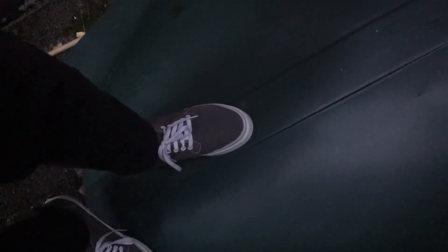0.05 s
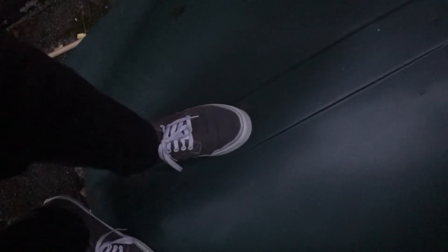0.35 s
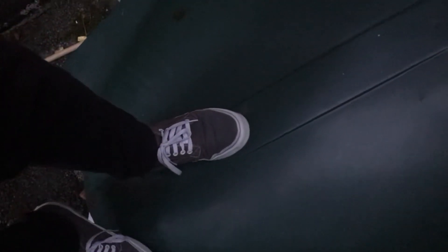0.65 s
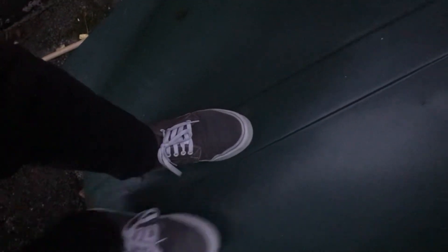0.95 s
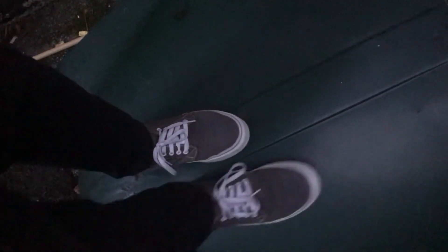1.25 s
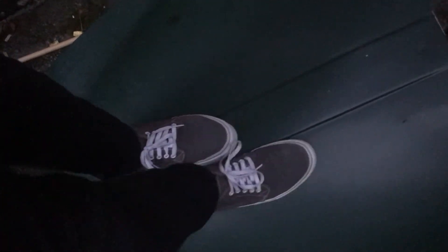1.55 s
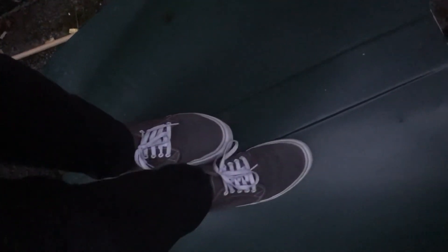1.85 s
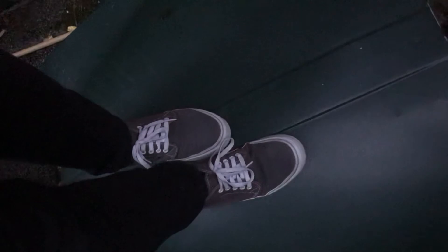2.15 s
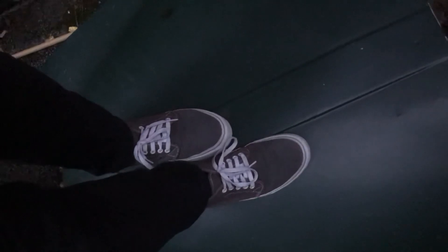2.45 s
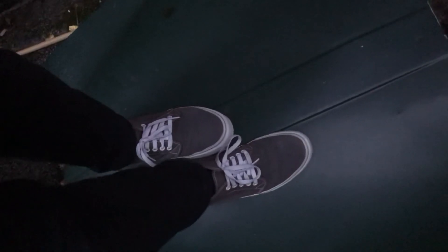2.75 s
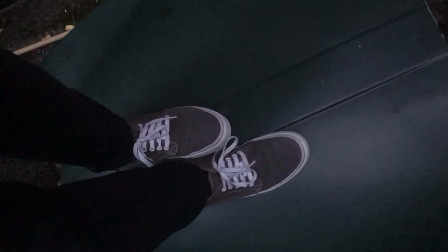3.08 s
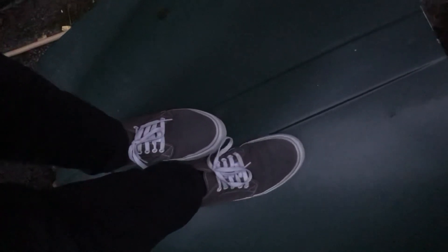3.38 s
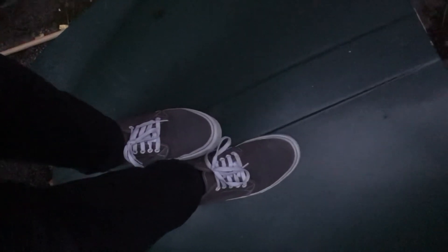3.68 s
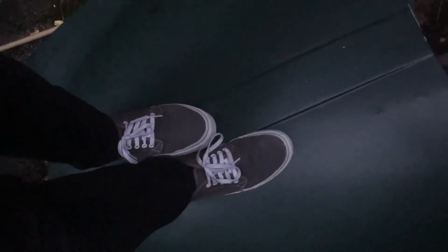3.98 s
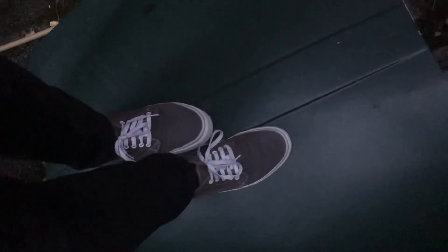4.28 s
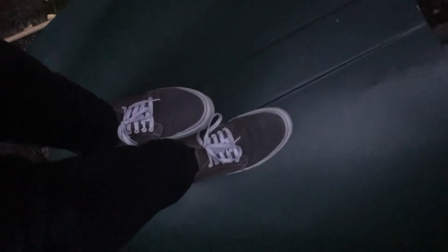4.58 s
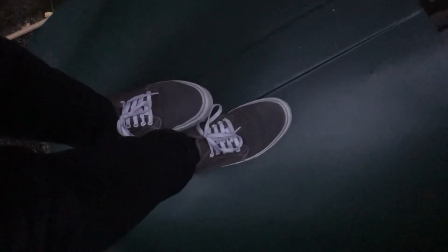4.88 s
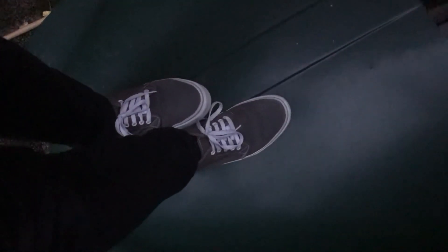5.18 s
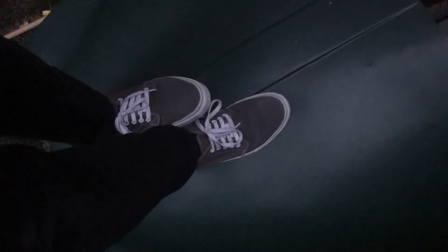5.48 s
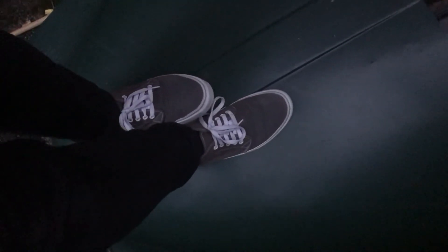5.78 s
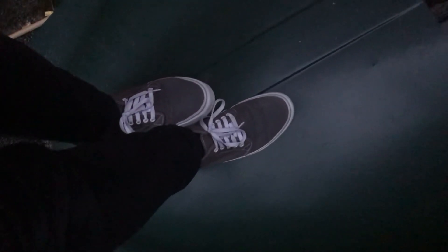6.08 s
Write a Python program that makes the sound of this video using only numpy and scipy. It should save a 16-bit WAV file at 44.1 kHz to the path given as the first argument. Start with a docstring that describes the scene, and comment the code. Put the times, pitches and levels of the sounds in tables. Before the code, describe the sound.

Outdoors, far traffic murmurs and trousers rustle faintly. A shoe steps onto a thin steel car panel with a soft, low thump. After a pause, shifting weight makes the metal cave in and spring back five times, close to the microphone, with loud hollow thuds and brief ringing crashes. The sole slips with a few tiny gritty ticks, and the quiet traffic murmur remains.

```python
"""Far traffic murmurs, trousers rustle, and for 3.45 s something ticks faintly in the treble.
At 1.5 s someone steps onto a thin steel car panel, which thumps in its low modes. From 3.5 to 5 s
their shifting weight makes it cave in and spring back; sudden flips also set its crowded upper modes
crashing. The sole slips with gritty ticks, and near 5.6 s a faint, thin whistle comes and goes."""
import sys
import numpy as np
from scipy import signal
from scipy.fft import rfft, irfft, next_fast_len
from scipy.io import wavfile

SR = 44100
rng = np.random.default_rng(int(sys.argv[2]) if len(sys.argv) > 2 else 0)


def inscribe(sig):
    """Save sig as 16-bit PCM at rate SR to the path in sys.argv[1].

    A 1-D sig is mono; a 2-D sig holds one channel per row.
    Samples are clipped to [-1, 1] before scaling.
    """
    pcm = np.round(np.clip(np.atleast_2d(sig).T, -1, 1) * 32767)
    wavfile.write(sys.argv[1], SR, pcm.astype(np.int16))


N = 270597
T = np.arange(N) / SR
SPAN = 2 ** 15  # samples per blow
AGE = np.arange(SPAN) / SR  # time since a blow, s
HZ = np.fft.rfftfreq(SPAN, 1 / SR)


def undb(db):
    """Decibels to gain."""
    return 10 ** (np.asarray(db) / 20)


def unit(x):
    """Scale to rms 1."""
    return x / np.std(x)


def at_hz(table, hz):
    """Read a table on a log-frequency axis."""
    table_hz, value = np.transpose(table)
    return np.interp(np.log(np.maximum(hz, 1)), np.log(table_hz), value)


def noise(colour, size):
    """Noise shaped by a table of f/Hz, level/dB."""
    padded = next_fast_len(size)
    gain = undb(at_hz(colour, np.fft.rfftfreq(padded, 1 / SR)))
    return irfft(rfft(rng.standard_normal(padded)) * gain, padded)[:size]


def wander(x):
    """Random curve, spread near 1, with a new value at every whole x."""
    return np.interp(x, np.arange(SPAN), rng.standard_normal(SPAN))


def swell(rise_s, t60_s):
    """Envelope of a vibration that builds up and dies away."""
    return (1 - np.exp(-AGE / max(rise_s, 1 / SR))) * np.exp(-np.log(1000) * AGE / t60_s)


def arch(middle_s, length_s):
    """Half-cosine envelope."""
    return np.cos(np.pi * np.clip((T - middle_s) / length_s, -.5, .5))


def add(out, start_s, sound):
    """Mix a sound in at start_s."""
    i = int(start_s * SR)
    out[i:i + len(sound)] += sound[:N - i]


def traffic(level_db=-50.5):
    """Steady murmur of far traffic."""
    # spectrum: f/Hz, relative level/dB
    colour = [(25, -2.5), (60, 3), (90, -6.5), (130, -6), (190, -15.5), (290, -9.5), (380, -17.5),
              (600, -21), (980, -17.5), (1400, -24.5), (2400, -37.5), (5000, -44.5), (10400, -49),
              (12000, -41), (16000, -49.5)]
    return unit(noise(colour, N)) * undb(level_db)


def trousers(rest_db=-73.5, settle_db_per_s=-0.93):
    """Trouser legs brush as the feet move, over a rustle that fades as the stance settles."""
    # brushes: middle t/s, length/s, level/dB
    brushes = [(.51, 0.1, -71), (1.03, 0.82, -64.5), (1.45, 0.44, -65.5), (1.9, 0.45, -68.5),
               (2.271, 0.11, -69), (2.724, .35, -73.5), (3.033, 0.17, -71), (3.458, 0.12, -59)]
    # cloth spectrum: f/Hz, relative level/dB
    colour = [(300, -22), (1200, -2.5), (3500, -3), (6000, -6.5), (9000, -6), (10500, -9), (13000, -7),
              (16000, -17)]
    flutter_db = 1.2 * wander(T * 40)
    rest = undb(rest_db + settle_db_per_s * T)
    brush_power = sum((undb(db) * arch(middle_s, length_s)) ** 2 for middle_s, length_s, db in brushes)
    return unit(noise(colour, N)) * np.sqrt(rest ** 2 + brush_power) * undb(flutter_db)


def faint_ticking(start_s=.034, period_s=.1023, stop_s=3.45, t60_s=0.043, level_db=-66, scatter_db=3):
    """Very faint, even ticking high in the treble."""
    colour = [(4000, -22), (10000, -12), (15500, 0)]  # f/Hz, relative level/dB
    envelope = np.exp(-np.log(1000) * ((T - start_s) % period_s) / t60_s) * (T < stop_s)
    return unit(noise(colour, N)) * envelope * undb(level_db + scatter_db * wander(T / period_s))


def sag(level_db=-15, length_s=0.01031):
    """Just before it lets go the sheet sinks, then swings up: one pressure swing."""
    window = np.sin(np.pi * np.clip(AGE / length_s, 0, 1))
    return -undb(level_db) * np.sin(2 * np.pi * AGE / length_s) * window


def low_modes(back, pitch_ratio, rise_s, soft_db_per_oct, t60_ratio=1.09):
    """Ring of the panel; a soft contact leaves its higher modes quiet."""
    # panel modes: base f/Hz, base t60/s, cave-in level/dB, spring-back level/dB
    modes = [(87, .3, -25, -22), (113, .25, -30, -28), (127.5, .27, -9, -13), (135, .55, -27, -21),
             (157, .35, -28, -28), (177, .55, -31, -38), (206, .28, -24, -21), (232, .72, -34, -21),
             (240, .42, -27, -24), (265, .9, -28, -36), (275, .7, -33, -22), (299.5, .3, -15, -15),
             (319, .42, -28, -21), (345, .35, -30, -27), (391, .33, -22, -19), (481, .42, -29, -29),
             (496, .5, -27, -27), (522.5, .53, -28, -22), (578, .35, -28, -31), (631, .33, -34, -34),
             (661, .42, -37, -30), (812.5, .38, -27, -28), (873, .24, -21, -37), (944, .26, -28, -42),
             (1075, .24, -26, -44), (1201, .22, -26, -45), (1245, .22, -25, -44), (1291, .16, -23, -44),
             (1328, .65, -43, -43)]
    hz, t60_s, cave_db, back_db = np.transpose(modes)
    gain = undb((1 - back) * cave_db + back * back_db - soft_db_per_oct * np.log2(hz / 128))
    polarity = (-1) ** np.arange(len(modes))  # neighbouring modes push the air in opposite directions
    tones = np.sin(np.outer(2 * np.pi * hz * pitch_ratio, AGE))
    fades = np.exp(np.outer(-np.log(1000) / (t60_s * t60_ratio), AGE))
    return (gain * polarity) @ (tones * fades) * (1 - np.exp(-AGE / rise_s))


def sheet_response():
    """Gain of the sheet over frequency: a few resonances stand out from the crowd."""
    # peaks and one dip: f/Hz, width/Hz, gain/dB
    formants = [(875, 40, 5), (1202, 16, 6), (1640, 40, 4), (1797, 24, 7), (1980, 22, 4), (2440, 22, 7),
                (2586, 24, 8), (3170, 50, 4), (3410, 26, 7), (4036, 25, 8), (4280, 25, 5), (4930, 200, -6)]
    return undb(sum(db / (1 + (2 * (HZ - hz) / width_hz) ** 2) for hz, width_hz, db in formants))


def crumple(rate_hz=400, jerk_db=3.5, settle_s=0.062):
    """Envelope: the metal gives way in small jerks, then rings smoothly."""
    return undb(jerk_db * wander(AGE * rate_hz) * np.exp(-AGE / settle_s))


def crowded_modes(colour, rise_s, tilt_db_per_oct, t60_ratio):
    """Modes too close to tell apart ring as noise; the high ones die first."""
    # ring time by band: f/Hz, base t60/s
    ring = [(70, 0.79), (250, 0.55), (600, 0.38), (1200, 0.29), (2500, 0.25), (4500, 0.2), (8000, 0.15),
            (14000, 0.13)]
    centres_hz, t60s = np.transpose(ring)
    octaves = np.log2(np.maximum(HZ, 1) / 2000)
    gain = sheet_response() * undb(at_hz(colour, HZ) + tilt_db_per_oct * octaves) * np.sqrt(SR / 2)
    spectrum = rfft(rng.standard_normal(SPAN) * crumple()) * gain
    bands = (irfft(spectrum * np.interp(HZ, centres_hz, share)) for share in np.eye(len(ring)))
    return sum(band * swell(rise_s, t60_ratio * t60_s) for band, t60_s in zip(bands, t60s))


def knock(slap_hz=158, level_db=-13, step_db=-6.0):
    """Springing back, the dent overshoots and slaps to and fro: a hollow knock."""
    slaps = sum(undb(step_db * k) * np.cos(2 * np.pi * (k + 1) * slap_hz * AGE) for k in range(4))
    return -undb(level_db) * slaps * swell(rise_s=0.0052, t60_s=0.12)


def thuds(heave_hz=73, cave_rise_s=.008, back_rise_s=.0033):
    """The sheet flips: it heaves as a whole, and its low modes ring at a pitch set by the load."""
    # footfalls and flips: t/s, level/dB, spring-back share/0-1, relative heave/dB, softness/(dB/oct)
    flips = [(1.455, -15.5, .05, -22, 4), (1.493, -16, 0, -16, 8.5), (3.483, 0.5, .04, -2.5, 3.5),
             (3.701, 2.5, 1, -25.5, 0), (4.103, 2.5, .19, -19, .5), (4.373, 1, .82, -27, 1.57),
             (5.004, -1, .03, -12, 2)]
    # dull wash of the sheet: f/Hz, spectral density/dB
    rumble_colour = [(30, -74.5), (70, -47.5), (130, -45.5), (280, -38.5), (500, -49), (750, -49.5),
                     (1000, -72.5), (2000, -76), (5000, -100)]
    out = np.zeros(N)
    heave = np.sin(2 * np.pi * heave_hz * AGE) * swell(rise_s=.012, t60_s=.17)
    for start_s, db, back, heave_db, soft_db_per_oct in flips:
        rise_s = (1 - back) * cave_rise_s + back * back_rise_s
        pitch_ratio = 1 - 0.0119 * soft_db_per_oct  # a soft, slow load lowers the pitch
        ring = low_modes(back, pitch_ratio, rise_s, soft_db_per_oct)
        rumble = crowded_modes(rumble_colour, rise_s / 2, tilt_db_per_oct=0, t60_ratio=.82)
        rumble *= undb(-0.8 - 0.64 * soft_db_per_oct)
        add(out, start_s - .005, undb(db) * (1 - back) * sag())
        add(out, start_s, undb(db) * (back * knock() + ring + undb(heave_db) * heave + rumble))
    return out


def crashes(jolt_lag_s=0.0034):
    """A sudden buckle spills energy into the high modes and jolts grit under the sole."""
    # buckles: t/s, level/dB, rise/s, tilt/(dB/oct)
    buckles = [(1.456, -30, .00084, -7), (1.510, -34.5, 0.0025, -2.5), (3.433, -37, .001, -3.5),
               (3.484, -7, 0.0029, 0.5), (3.507, -5, 0.0049, -3.5), (3.576, -21.5, 0.0048, -1),
               (3.718, -3, 0.02, -0.2), (4.103, 2.5, 0.0074, -0.5), (4.380, -13, .032, -4.5),
               (4.435, -18.5, .013, -5.5), (5.006, -4, 0.0023, -0.76)]
    # crowded modes: f/Hz, spectral density/dB
    colour = [(150, -97.5), (400, -50.5), (800, -49), (1050, -50.5), (1300, -47.5), (2000, -51.5),
              (3200, -50.5), (4300, -53), (5000, -56), (7000, -60.5), (10200, -68), (13000, -67.5),
              (16000, -78)]
    out = np.zeros(N)
    for start_s, db, rise_s, tilt_db_per_oct in buckles:
        t60_ratio = 1.034 * np.exp(-0.0049 * db)  # harder crashes die sooner
        add(out, start_s, undb(db) * crowded_modes(colour, rise_s, tilt_db_per_oct, t60_ratio))
        jolt_db = db - 28.5 + 1.1 * tilt_db_per_oct  # brighter crashes jolt more
        add(out, start_s + jolt_lag_s, undb(jolt_db) * grit(t60_s=.02 + 5 * rise_s))
    return out


def grit(t60_s, rough_db=3, rough_hz=700):
    """One bright, gritty slip of the sole on the paint."""
    # slip spectrum: f/Hz, relative level/dB
    colour = [(1000, -20.5), (4000, -11), (9500, -9), (12000, -2), (14000, -2), (16000, -5.5)]
    scrape = noise(colour, SPAN) * undb(rough_db * wander(AGE * rough_hz))
    return unit(scrape) * swell(.00028, t60_s)


def sole_ticks(ref_t60_s=0.019, ref_db=-51, doubling_db=5.5):
    """The sole slips as the weight shifts; the harder, the longer."""
    # slips: t/s, level/dB
    slips = [(3.528, -37.5), (3.781, -37.5), (4.333, -52), (4.357, -51.5), (4.7776, -50.5), (5.475, -53.5),
             (5.681, -53), (5.781, -51.5)]
    out = np.zeros(N)
    for start_s, db in slips:
        t60_s = ref_t60_s * 2 ** ((db - ref_db) / doubling_db)
        add(out, start_s, undb(db) * grit(t60_s))
    return out


def whistle(pitch_hz=3880, waver=0.0188, level_db=-80, flutter_db=4):
    """A thin, wavering tone far off."""
    hz = pitch_hz * (1 + waver * wander(T * 120))
    tone = np.sin(2 * np.pi * np.cumsum(hz) / SR)
    return tone * undb(level_db + flutter_db * wander(T * 25)) * arch(middle_s=5.57, length_s=.55)


def early_reflections(x, wet_db=-24):
    """Weak, bright early reflections from the surroundings."""
    envelope = swell(rise_s=0.035, t60_s=.3)
    impulse = rng.standard_normal(SPAN) * envelope / np.linalg.norm(envelope)
    return undb(wet_db) * signal.fftconvolve(x, impulse)[:N]


def yard_reverb(x, gain_db=-27, cutoff_hz=1100):
    """Faint, dull reverberation from the surroundings."""
    tail = signal.sosfilt(signal.butter(2, cutoff_hz, fs=SR, output="sos"), rng.standard_normal(SPAN))
    envelope = swell(rise_s=0.033, t60_s=0.62)
    return undb(gain_db) * signal.fftconvolve(x, tail * envelope / np.linalg.norm(envelope))[:N]


def scene():
    """The panel close by, in a quiet open place; mono."""
    panel = thuds() + crashes() + sole_ticks()
    echoes = early_reflections(panel) + yard_reverb(panel)
    return (panel + echoes + trousers() + traffic() + faint_ticking() + whistle())[None]


def record(dry, low_cut_hz=46, high_cut_hz=15900):
    """Cut the deep bass and the top treble."""
    lean = signal.sosfilt(signal.butter(4, low_cut_hz, "high", fs=SR, output="sos"), dry)
    return signal.sosfilt(signal.ellip(8, .2, 70, high_cut_hz, fs=SR, output="sos"), lean)


dry = scene()
out = record(dry)
inscribe(out)
```